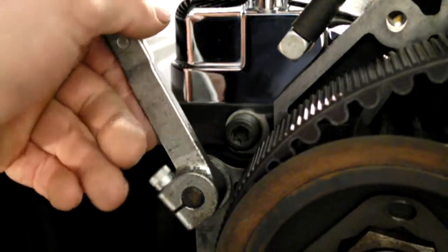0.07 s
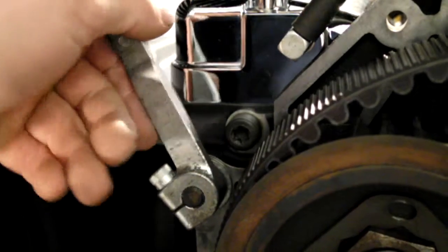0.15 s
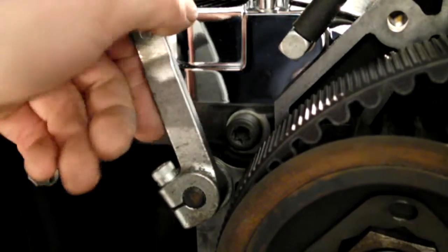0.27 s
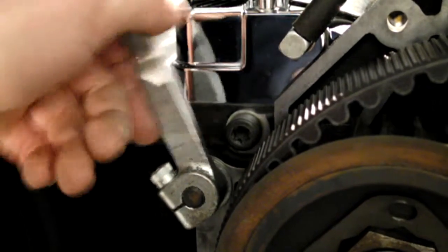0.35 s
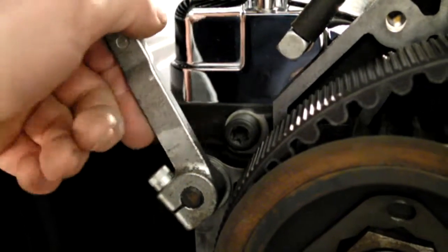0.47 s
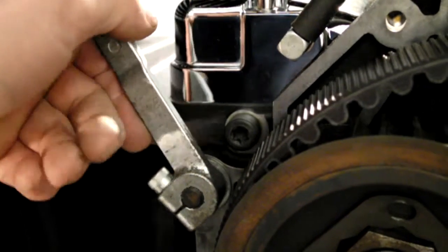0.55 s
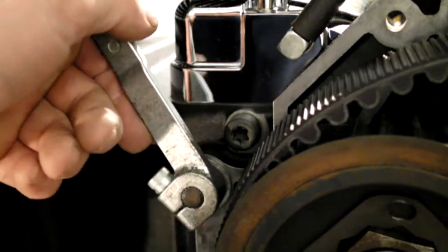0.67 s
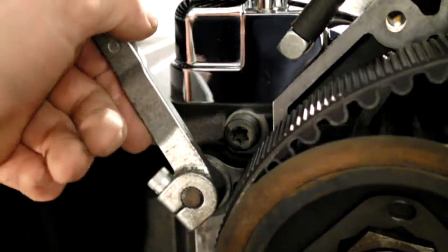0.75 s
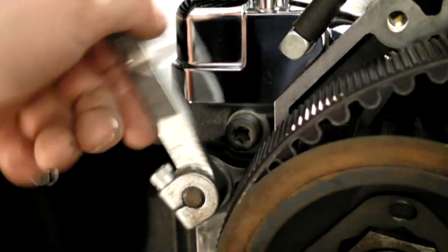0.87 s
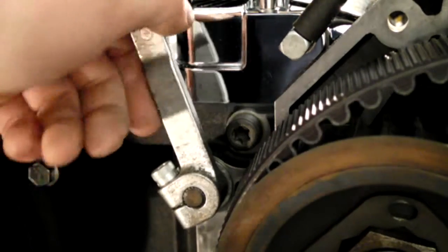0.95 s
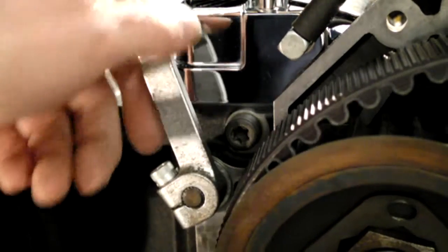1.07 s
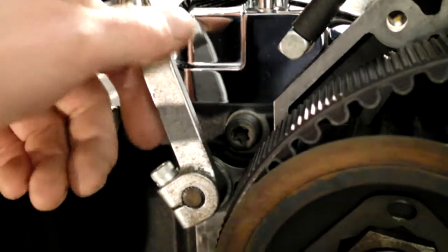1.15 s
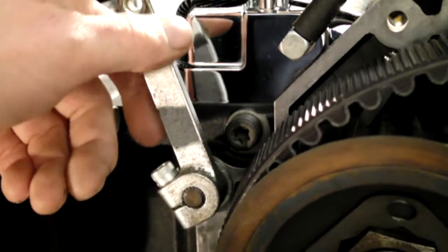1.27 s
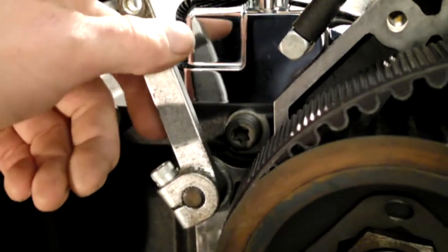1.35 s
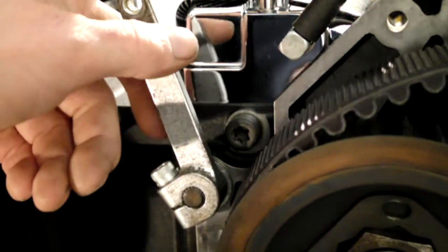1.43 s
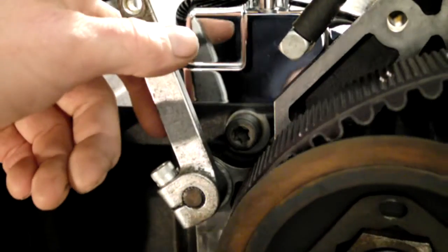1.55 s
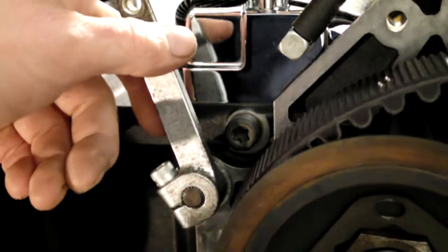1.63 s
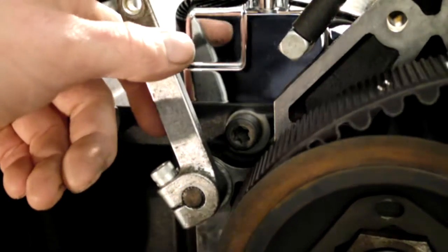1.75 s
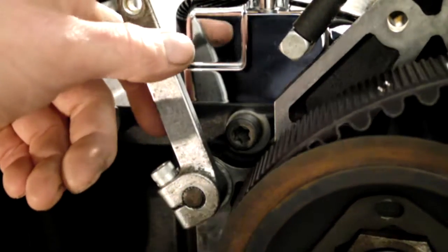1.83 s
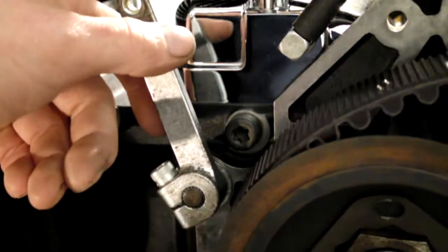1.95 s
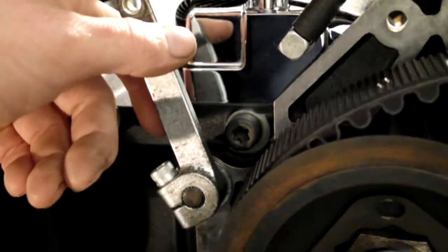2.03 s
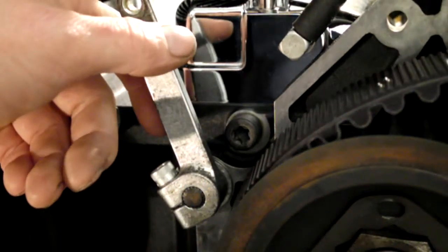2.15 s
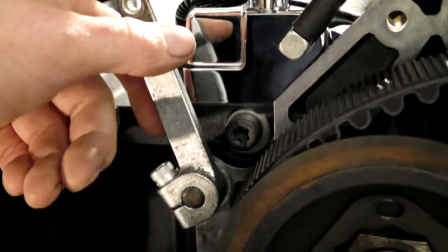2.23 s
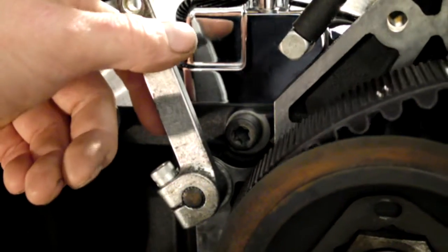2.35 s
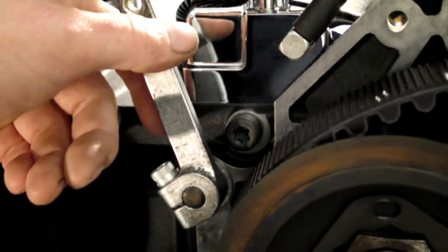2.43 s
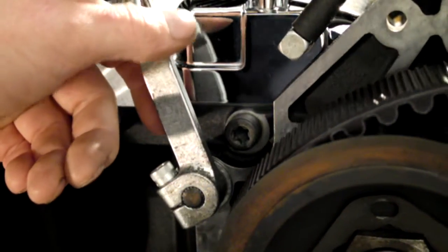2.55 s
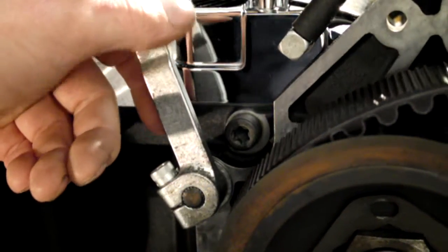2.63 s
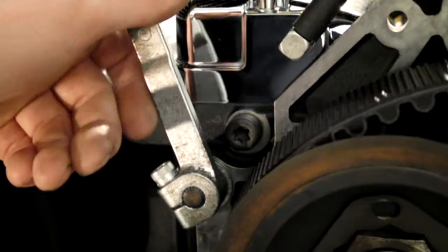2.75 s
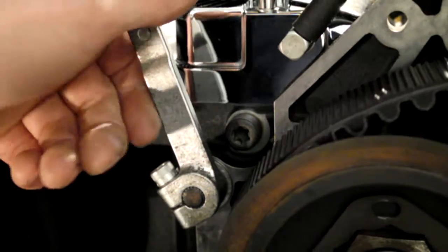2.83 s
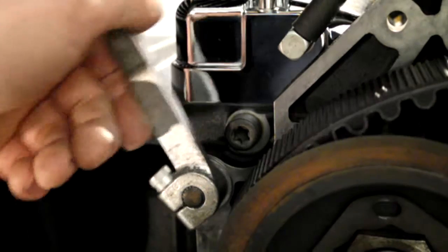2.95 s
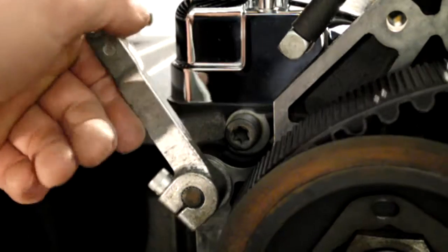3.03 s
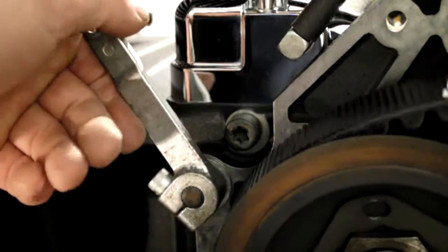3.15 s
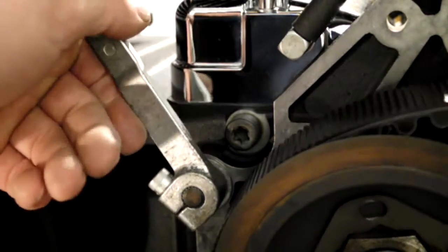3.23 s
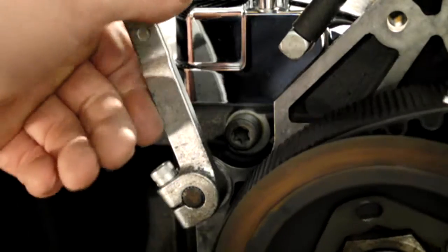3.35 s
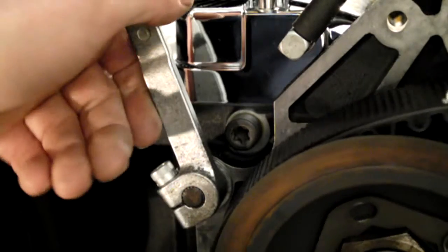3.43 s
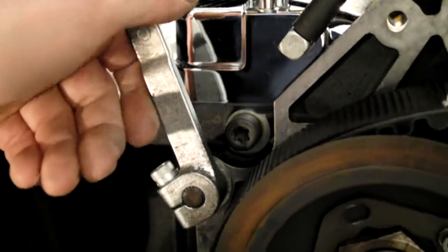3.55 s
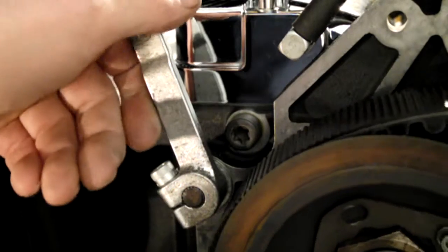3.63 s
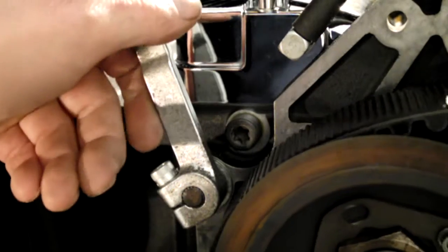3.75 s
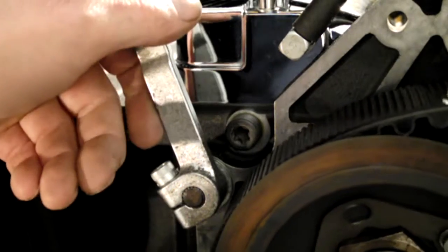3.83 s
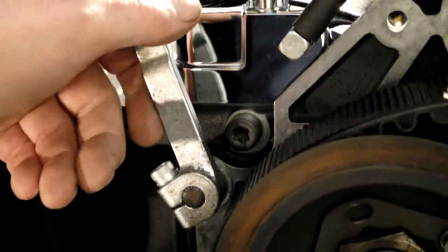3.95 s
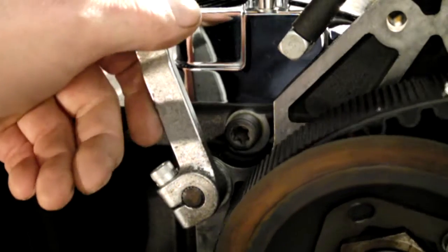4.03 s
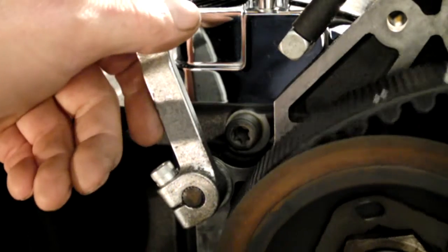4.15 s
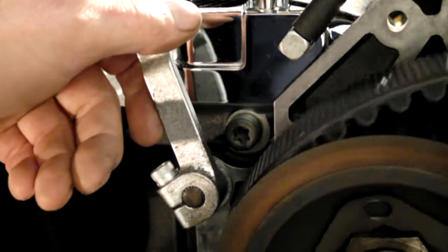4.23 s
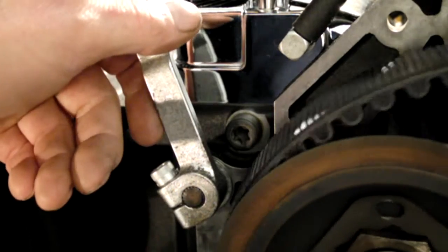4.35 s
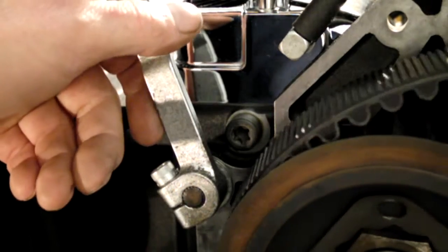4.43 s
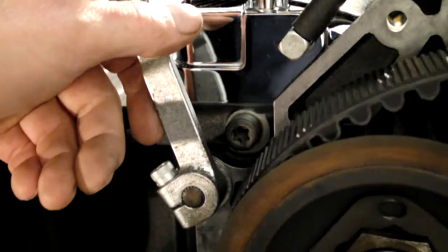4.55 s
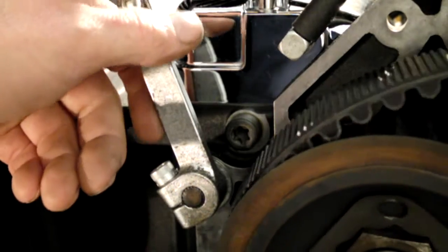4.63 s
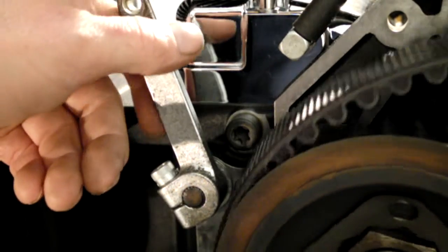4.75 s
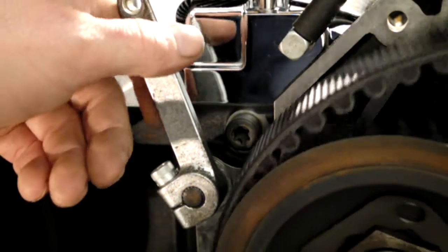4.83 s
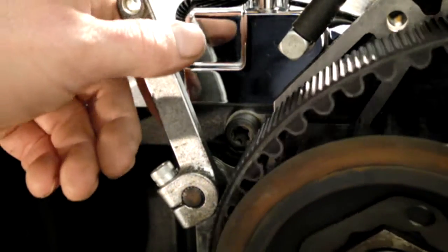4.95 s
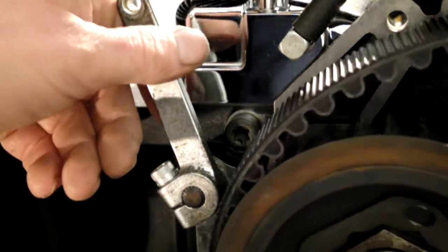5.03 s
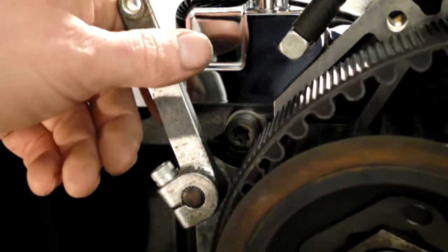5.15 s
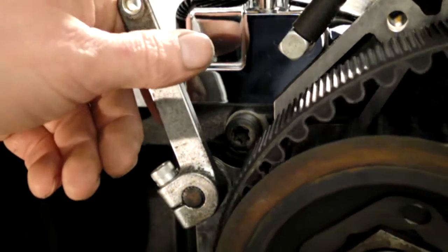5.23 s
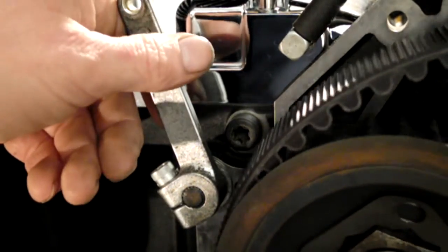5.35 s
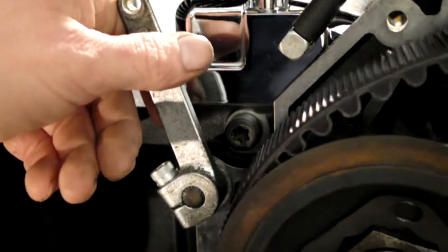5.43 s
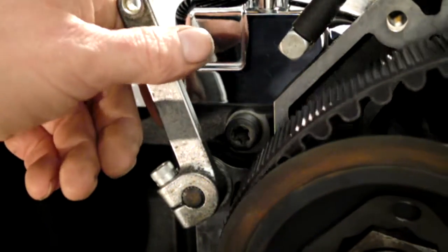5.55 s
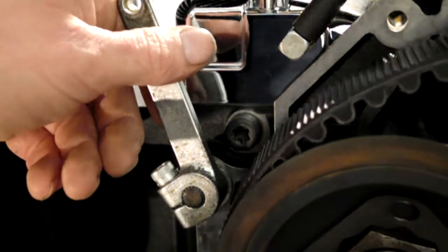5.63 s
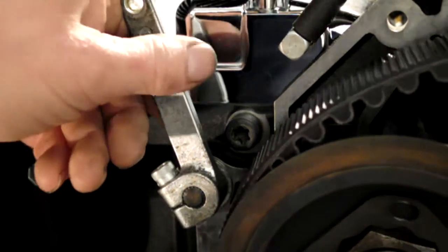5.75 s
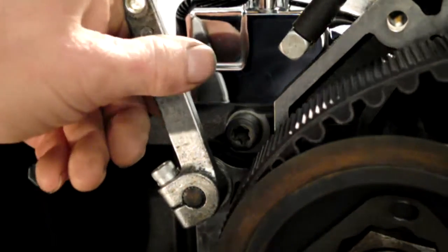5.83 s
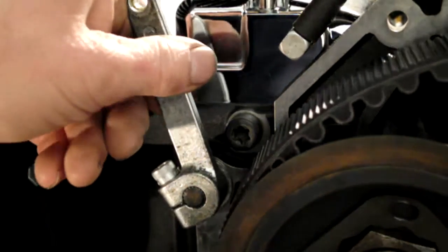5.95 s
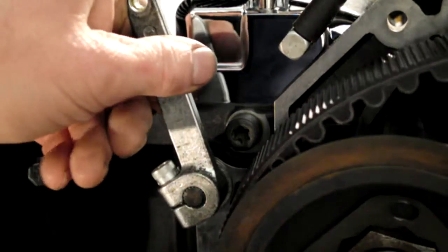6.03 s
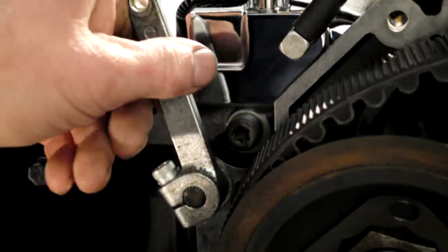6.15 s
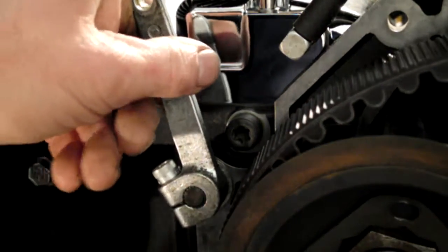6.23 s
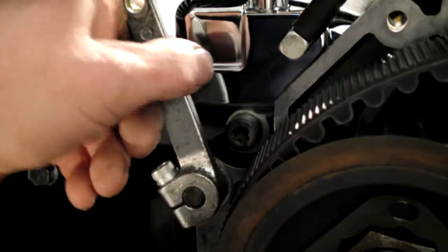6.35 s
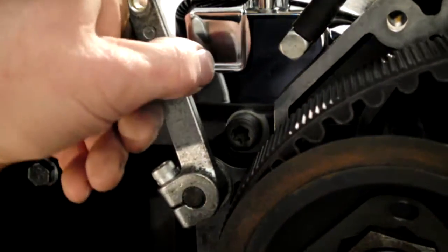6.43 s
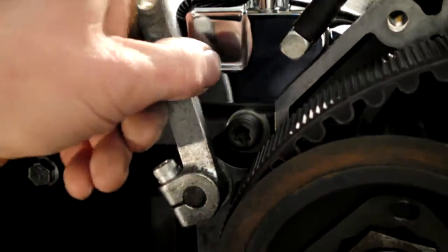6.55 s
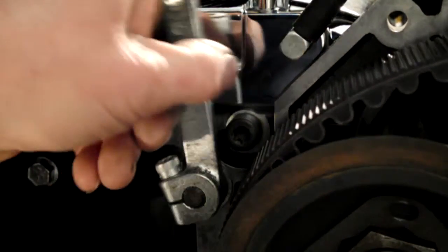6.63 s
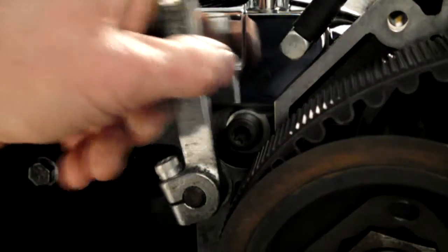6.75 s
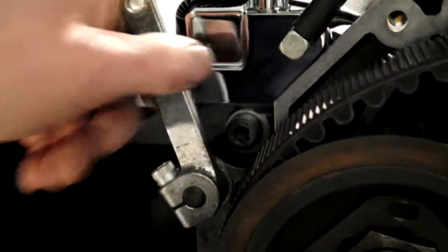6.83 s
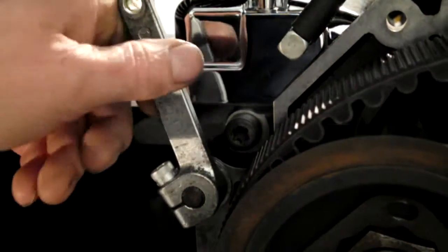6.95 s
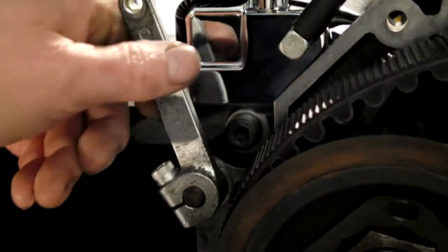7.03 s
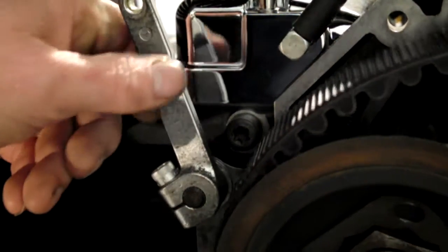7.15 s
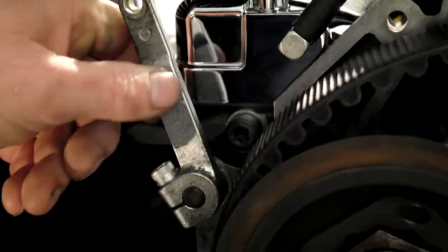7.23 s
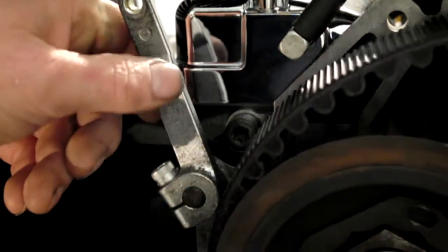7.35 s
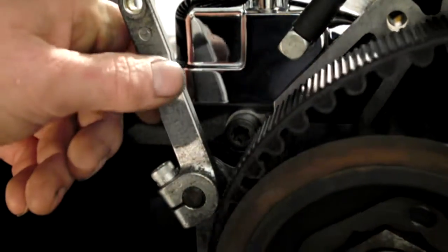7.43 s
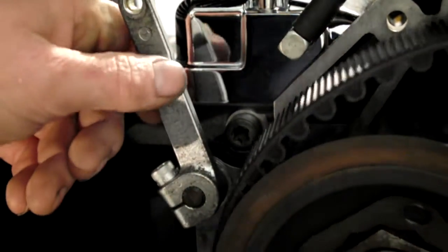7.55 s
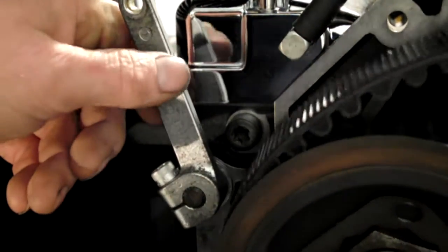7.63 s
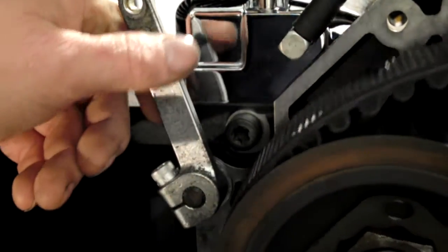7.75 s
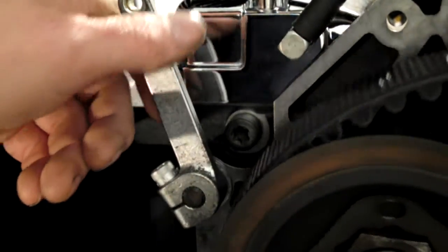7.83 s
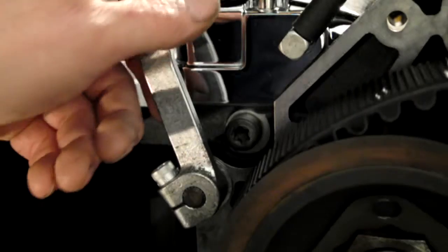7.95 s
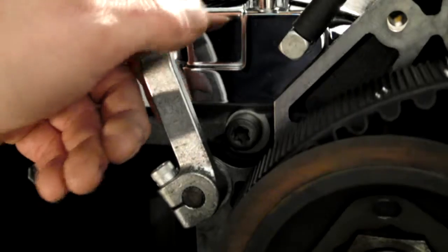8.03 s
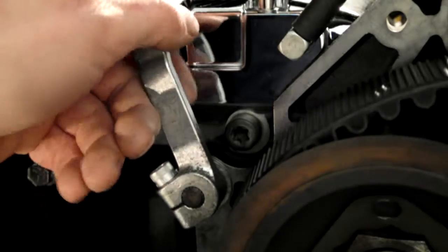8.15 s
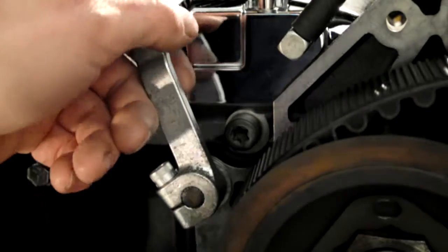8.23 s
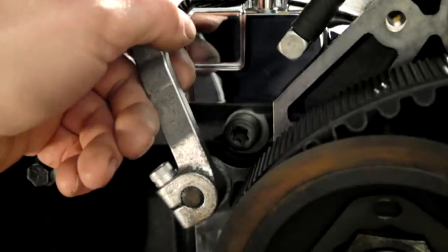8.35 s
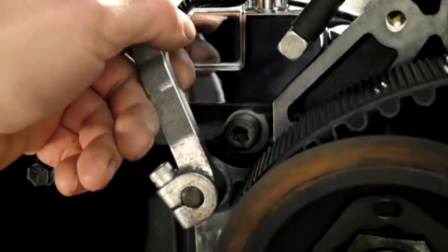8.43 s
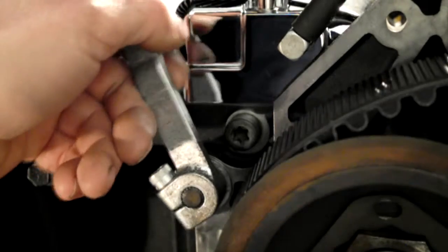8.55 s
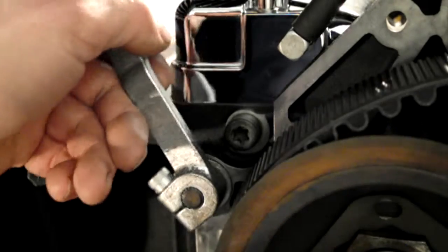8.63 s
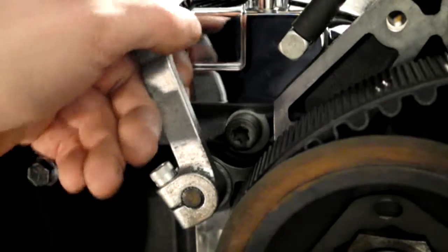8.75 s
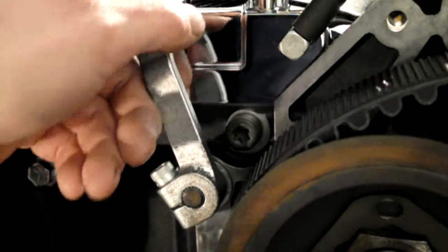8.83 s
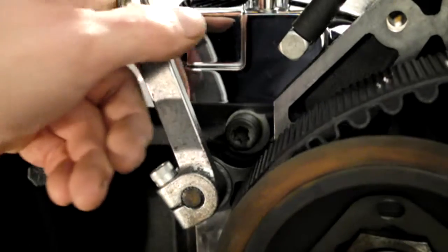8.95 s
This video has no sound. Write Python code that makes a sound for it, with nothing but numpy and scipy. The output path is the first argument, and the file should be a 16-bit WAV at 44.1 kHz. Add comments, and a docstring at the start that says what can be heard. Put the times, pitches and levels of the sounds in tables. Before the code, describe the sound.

Steel ratchet parts click and clack inside a gearbox, very near, in stereo, with a short indoor reverberation. Light clunks open, a quiet gap follows, then a crisp double snap, several hollow knocks, and the loudest group of sharp clacks. More dull knocks with faint rubbing follow, then a bright crack and small clicks. Soft low humming and airy hiss rise and sink throughout.

```python
"""In a workshop, close to the microphone, a hand works the gear lever of a motorcycle whose engine is off.
Ratchet and shift drum click and clack: shaped noise cracks, modes of the steel and reflections.
As the belt pulley is rocked, gear dogs knock dully (decaying modes) and belt and shaft rub (band noise).
Below lie a low hum of wavering sines and a thin hiss of shaped noise, which swell and fade."""
import sys
import numpy as np
from scipy import signal
from scipy.fft import rfft, irfft
from scipy.io import wavfile
from scipy.ndimage import uniform_filter1d

SR = 44100
rng = np.random.default_rng(int(sys.argv[2]) if len(sys.argv) > 2 else 0)


def unload_wav(signal):
    """Save mono or channel-first audio to the path in sys.argv[1] as 16-bit WAV at rate SR, clipped to [-1, 1]."""
    wavfile.write(
        sys.argv[1],
        SR,
        np.round(np.clip(np.atleast_2d(signal).T, -1, 1) * 32767).astype(np.int16),
    )


N = 396018  # samples

# All table levels are relative; gains follow where the sources are built.
# Spectrum of the background rumble and hiss: (frequency [Hz], density [dB per Hz])
AIR_SPECTRUM = [(15, -19), (24, -13), (31, -15), (41, -2), (54, -10.5), (72, -6), (90, -15), (135, -23),
                (330, -26), (700, -33), (1260, -36), (1560, -44), (2650, -37), (3300, -40), (15000, -44)]
# Crests of the swelling hiss and hum: (time [s], hiss level [dB], hum level [dB])
SWELLS = [(0, 1.5, -51.5), (.8, 5.5, -42), (3.5, 6, -42.5), (7.001, 5.5, -54.5), (7.75, 3, -49),
          (8.98, 8, -59)]
# Spectral lines of the hum: (frequency [Hz], level [dB], nominal line width [Hz])
HUM_LINES = [(69.2, -3, 1.57), (102.6, -14, 1.7), (108.3, -18.5, 1.2), (164, -23.5, 0.87),
             (200, -22.5, 1.4), (400, -22.5, 2)]
# Likeness of the two channels: (frequency [Hz], shared share of amplitude [0-1])
CHANNEL_LIKENESS = [(60, .95), (130, .86), (290, .85), (640, .78), (1400, .56), (3100, .25), (7000, .1)]
# Left channel over right: (frequency [Hz], level difference [dB])
LEFT_OVER_RIGHT = [(60, 4.5), (1200, 4), (2400, 2.5), (4400, 1), (8000, 2), (15000, -0.5)]
# Reverberation of the workshop: (frequency [Hz], t60 [s])
ROOM_DECAY = [(250, 0.91), (800, 0.5), (2200, 0.41), (3800, 0.4), (6000, 0.39), (9500, 0.34), (14000, 0.23)]
# Colour of its reflections: (frequency [Hz], level [dB])
WALL_COLOUR = [(300, 3), (800, -0.5), (1300, 0.5), (2400, 1), (3750, -4), (5000, 0.5), (6300, -2.5),
               (8000, -1.5), (14000, -2)]
# Belt and shaft rubbing as the pulley turns:
# (time [s], length [s], level [dB], centre [Hz], full width at half amplitude [Hz])
RUBS = [(0.599, 0.61, -59, 786, 1700), (4.08, 0.11, -63.5, 3720, 400), (4.759, 0.25, -64.5, 4550, 6900),
        (5.242, 0.14, -68.5, 5460, 5900), (7.2, .52, -60, 436, 14), (7.443, 0.25, -62.5, 5100, 5600),
        (8.861, 0.15, -49.5, 385, 490)]
# The frame booming under some of the blows: (time [s], level [dB], pitch [Hz])
FRAME_BOOMS = [(.555, -35.5, 213), (.557, -39.5, 880), (6.594, -38.5, 62), (6.657, -38, 390),
               (7.083, -46, 845), (7.209, -51, 468), (7.707, -44, 330), (7.708, -48.5, 690)]
# Gear dogs taking up their slack: (time [s], level [dB], brightness [dB per octave])
DOGS = [(4.1225, -40.5, -0.5), (4.3709, -38.5, 0.5), (4.8803, -43, -1), (5.5868, -63, 10.5),
        (7.0822, -38.5, 9.5), (7.2078, -39.5, 3.5)]
# Modes of the gear train: (frequency [Hz], level [dB], t60 [s])
GEAR_MODES = [(302, -10.5, 0.19), (418, -1.5, 0.062), (510, -6, 0.1), (612, -5.5, 0.052), (708, 2, 0.027),
              (910, 6, 0.058), (917, -1.5, 0.086), (1787, -9.5, 0.061), (1877, -8.5, 0.069)]
# Centres of the bands in which a blow is built: [Hz]
BANDS_HZ = [450, 1100, 2300, 4000, 7500, 13000]
# Broad response of the gearbox case: (frequency [Hz], level [dB])
CASE_RESPONSE = [(90, -17), (230, -2), (650, -5), (1130, 3.5), (1570, -13.5), (1880, -3), (2400, -1),
                 (3050, -4), (3750, 7), (4750, -1), (6100, 5.5), (8200, 0.5), (9300, -1), (15000, -13.5)]
# Modes of lever, shaft and drum, detuned slightly at each blow: (frequency [Hz], level [dB], t60 [s])
STEEL_MODES = [(235, -5, .15), (305, -5, .15), (350, -6, .12), (445, -4, .1), (560, -6, .08),
               (790, -4, .05), (960, -4, .06), (1090, -4, .05), (1210, -5, .05), (1794, -5, .1),
               (1890, -4, .08), (1972, -5, .1), (2198, -8, .11), (2250, -8, .11), (2460, -7, .08),
               (2960, -5, .1), (3423, -2, .08), (3732, -2, .06), (3968, -2, .06), (4236, -6, .07),
               (5701, -6, .12), (5897, -6, .1), (6115, -5, .1), (6332, -4, .11), (7430, -7, .07),
               (7735, -8, .08), (8565, -7, .09), (9240, -3, .06), (9450, -7, .07), (11400, -9, .06)]
# Dull knocks of the case as the gears engage; a softer contact has a lower cut-off:
# (time [s], level [dB], cut-off [Hz])
KNOCKS = [(0.5544, -37.5, 2600), (.607, -45.5, 1700), (.753, -54.5, 6500), (1.565, -51.5, 2700),
          (2.362, -54.5, 2600), (3.2748, -52.5, 7000), (4.272, -52, 1200), (4.445, -56, 3900),
          (6.5447, -54, 1200), (7.082, -42.5, 2100), (7.7065, -41, 4200), (8.922, -56, 4000)]
# Colour of a knock: (frequency [Hz], level [dB])
KNOCK_COLOUR = [(450, -1), (1100, 0), (2300, -1), (4000, -3.5), (7500, -3.5), (13000, -8)]
# Sharp clicks of ratchet, pawl and shift drum: (time [s], level [dB], brightness [dB per octave],
# thud [dB], pitch of the struck part [Hz], reflections [dB])
CLICKS = [ (.208, -56.5, 7, 11.5, 3960, -7.5), (0.3861, -38, -2.5, 3, 4050, -3),
          (.537, -45.5, 4, 9, 3650, -8), (0.54, -41, 2.6, 2, 3700, -4.5), (0.9056, -49, 6, 9.5, 3900, -3.5),
          (2.982, -46, -4.5, -3, 3830, -6), (3.0241, -43.5, -11, 5, 2410, 0.5),
          (3.0373, -32.5, 1, -3.5, 6400, -0.5), (3.346, -24.5, 3, -1.5, 6060, -6),
          (3.35, -30.5, 4.5, -1, 9200, -7.5), (6.308, -42, 1, -4, 6100, -1), (6.377, -44, -3, -1, 2200, -1),
          (6.585, -33, .9, 2, 6110, -3.5), (6.594, -25.4, 1.3, -2.5, 3780, -4.5),
          (6.6563, -19.5, -1, -3, 3670, -5), (6.7711, -36.5, -.5, -1, 3840, -10.5),
          (6.834, -22.5, 3.5, -4, 9230, -7), (8.6116, -42, 4.5, 0.8, 2400, 3.5),
          (8.62, -24.5, -0.65, -12, 3570, -7), (8.721, -46.5, 0.5, 5.5, 3750, 3.5),
          (8.747, -32.5, -4, -3, 2420, -2.5), (8.7533, -30.5, -7, -10, 3840, -9),
          (8.79, -52, 5, 10, 3750, -9)]
# Colour of a click: (frequency [Hz], level [dB])
CLICK_COLOUR = [(450, -16), (1100, -8), (2300, -1.06), (4000, -0.54), (7500, -2.5), (13000, -9)]

SWELL_DB_PER_S, HISS_SINK_DB_PER_S, HUM_SINK_DB_PER_S = 18.5, 6.5, 7
BOOM_T60_S, BOOM_WIDTH = .33, .45  # width as a share of the pitch
CLICK_T60_S, KNOCK_T60_S = 0.067, .05  # at 4000 Hz
KNOCK_ROOM_DB = -6.5
THUD_HZ, BRIGHT_HZ = 990, 2420  # thud is full below the first, gone at the second, where brightness begins
PING_DB, PING_WIDTH_HZ, PING_T60_S = -5.5, 450, 0.052  # ring round the pitch of the struck part
CHATTER_DB, CHATTER_DB_PER_S, CHATTER_FROM_S, CHATTER_TO_S = -18, 128.5, .012, .11
EDGE_HZ = 15250  # upper band limit


def amp(db):
    """Level and amplitude: 20 dB are a factor of ten."""
    return 10 ** (np.asarray(db) / 20)


def evened(x):
    """Normalization: scales a signal to rms 1."""
    return x / np.sqrt(np.mean(x ** 2) + 1e-20)


def read(points, hz):
    """Interpolation of a table along a logarithmic frequency axis."""
    f, value = np.transpose(points)
    return np.interp(np.log(hz + 1), np.log(f + 1), value)


def add(mix, s, sound):
    """Superposition: a stereo sound is summed in at time s, in place."""
    part = mix[:, round(s * SR):][:, :sound.shape[1]]
    part += sound[:, :part.shape[1]]


def noise(colour, size):
    """Partial coherence: stereo noise of gain colour(Hz), alike in the bass, nearly unrelated in the treble."""
    hz = np.fft.rfftfreq(size, 1 / SR)
    a, b, c, d = rng.standard_normal((4, len(hz)))
    alike = np.clip(read(CHANNEL_LIKENESS, hz), 0, 1)
    left = a + 1j * b
    right = alike * left + np.sqrt(1 - alike ** 2) * (c + 1j * d)
    return evened(irfft(np.array([left, right]) * colour(hz), size))


def resonance(centre_hz, width_hz):
    """Resonance curve: gain falls to half at half the width from the centre."""
    return lambda f: 1 / (1 + (2 * (f - centre_hz) / width_hz) ** 2)


def swell(crests_db, sink_db_per_s):
    """Exponential growth and decay: gain climbs quickly to each crest and sinks more slowly after it."""
    since = np.arange(N) / SR - np.array(SWELLS)[:, :1]
    slopes_db = np.minimum(SWELL_DB_PER_S * since, -sink_db_per_s * since)
    return amp((crests_db[:, None] + slopes_db).max(0))


def air(level_db=-52):
    """Broadband noise: the rumble and hiss of the workshop have a continuous spectrum."""
    hiss = noise(lambda f: amp(read(AIR_SPECTRUM, f)) * (f > 8), N)
    return amp(level_db) * swell(np.array(SWELLS)[:, 1], HISS_SINK_DB_PER_S) * hiss


def hum(level_db=0, waver=0.13):
    """Line broadening: a random walk of phase widens each low line, whose strength also wavers."""
    t, out = np.arange(N) / SR, np.zeros(N)
    for hz, db, width in HUM_LINES:
        drift = np.cumsum(rng.standard_normal(N)) * np.sqrt(2 * np.pi * width / SR)
        smooth = uniform_filter1d(rng.standard_normal(N), size=6000)
        flutter = evened(uniform_filter1d(smooth, size=3000))
        phase = 2 * np.pi * hz * t + uniform_filter1d(drift, size=2000)
        out += np.sqrt(2) * amp(db) * (1 + waver * flutter) * np.sin(phase)
    return amp(level_db) * swell(np.array(SWELLS)[:, 2], HUM_SINK_DB_PER_S) * out


def workshop(x, wet_db=-2, build_s=0.0077):
    """Reverberation: dense reflections from machine and walls, each band dying at its own rate."""
    taps = noise(np.ones_like, size=20480)
    hz, t, z = signal.stft(taps, SR, nperseg=256)
    fade = amp(read(WALL_COLOUR, hz)[:, None] - 60 * t / read(ROOM_DECAY, hz)[:, None])
    tail = signal.istft(z * fade, SR, nperseg=256)[1]
    seconds = np.arange(tail.shape[1]) / SR
    tail = tail * (1 - np.exp(-(seconds / build_s) ** 2))
    wet = signal.fftconvolve(x, tail / np.linalg.norm(tail[0]), axes=1)
    return amp(wet_db) * wet[:, :x.shape[1]]


def in_room(sound, room_db):
    """Direct and reflected sound: one blow with its own reflections."""
    sound = np.pad(sound, ((0, 0), (0, SR // 3)))
    return sound + amp(room_db) * workshop(sound)


def rubs():
    """Friction noise: rubbing surfaces excite one resonance, in a soft swell."""
    out = np.zeros((2, N))
    for s, length, db, hz, width in RUBS:
        size = int(length * SR)
        rub = noise(resonance(hz, width), size)
        add(out, s, amp(db) * rub * signal.windows.tukey(size, .6))
    return out


def burst(hz, width, t60):
    """Bandwidth and build-up: crowded resonances round one pitch, slower to build when narrow."""
    t = np.arange(SR // 2) / SR
    body = noise(resonance(hz, width), len(t)) * amp(-60 * t / t60)
    early = body[:, :SR // 30]
    return (1 - np.exp(-np.pi * width * t)) * body / early.std()


def frame():
    """Structural resonance: the frame booms under some of the blows."""
    out = np.zeros((2, N))
    for s, db, hz in FRAME_BOOMS:
        add(out, s, amp(db) * burst(hz, BOOM_WIDTH * hz, BOOM_T60_S))
    return out


def ring(modes, t, scatter_db):
    """Modal decay: each blow excites the modes differently; high ones reach the channels out of step."""
    hz, db, t60 = np.transpose(modes)[:, :, None]
    size, phase, skew = rng.standard_normal((3, len(modes), 1))
    apart = skew * np.minimum(hz / 3000, 2)
    fade = amp(db + scatter_db * size - 60 * t / t60)
    angle = 2 * np.pi * (hz * t + phase)
    return np.array([(fade * np.sin(angle + side * apart)).sum(0) for side in (-.5, .5)])


def dogs(tick_db=-5, tick_t60=0.023):
    """Damped modes: gear dogs knock dully in the oily gear train, with a short tick of contact noise."""
    out, t = np.zeros((2, N)), np.arange(SR // 2) / SR
    onset = 1 - np.exp(-t / 0.0017)
    for s, db, bright_db in DOGS:
        modes = [(hz, level + bright_db * np.log2(hz / 926), t60) for hz, level, t60 in GEAR_MODES]
        contact = noise(lambda f: f / (f + 200) / (1 + (f / 1100) ** 2), len(t))
        tick = contact * amp(tick_db - 60 * t / tick_t60)
        teeth = ring(modes, t, scatter_db=1)
        add(out, s, amp(db) * (teeth + tick) * onset)
    return out


def blow(levels_db, t60, bass_hold=0.094, direct_s=0.00034):
    """Impact excitation: a crack of dense, quickly dying case resonances and a faint ring of the steel."""
    size, attack = 12288, 617  # samples
    steel_db, detune, rise_s = -10, .004, .0006
    t, hz = np.arange(size) / SR, np.fft.rfftfreq(size, 1 / SR)
    crack = noise(lambda f: amp(read(CASE_RESPONSE, f)) * f ** 2 / (f ** 2 + 110 ** 2), size)
    # the first instant reaches both channels alike, before the machine's surfaces scatter it
    direct = np.exp(-t / direct_s)
    right = direct * crack[0] + np.sqrt(1 - direct ** 2) * crack[1]
    crack = rfft([crack[0], right])
    # the parts bear on each other differently at every blow, which shifts their modes
    shift = np.outer(rng.standard_normal(len(STEEL_MODES)), [detune, 0, 0])
    steel = rfft(ring(np.array(STEEL_MODES) * (1 + shift), t, scatter_db=2.5), 2 * size)
    steel_hz = np.fft.rfftfreq(2 * size, 1 / SR)
    onset = 1 - np.exp(-t / rise_s)
    out = np.zeros((2, size))
    for centre, db, share in zip(BANDS_HZ, levels_db, np.eye(len(BANDS_HZ))):
        band = list(zip(BANDS_HZ, share))  # full at its own centre, nothing at the neighbours'
        band_t60 = t60 * (4000 / centre) ** bass_hold
        dense = irfft(crack * read(band, hz), size) * amp(-60 * t / band_t60)
        lines = irfft(steel * read(band, steel_hz))[:, :size]
        dense = dense / dense[:, :attack].std()
        lines = lines / lines[:, :attack].std()
        part = onset * (dense + amp(steel_db) * lines)
        out += amp(db) * part / part[:, :attack].std()
    return out


def chatter(sound):
    """Repeated impact: loose parts rebound weakly six times, at uneven moments, after a blow."""
    out = np.pad(sound, ((0, 0), (0, SR // 4)))
    for when, strength in rng.random((6, 2)):
        s = CHATTER_FROM_S + when * (CHATTER_TO_S - CHATTER_FROM_S)
        add(out, s, strength * amp(CHATTER_DB - CHATTER_DB_PER_S * s) * sound)
    return out


def knocks(level_db=-1):
    """Contact time: softer blows inside the case last longer, which cuts their treble off steeply."""
    out, bands = np.zeros((2, N)), np.array(BANDS_HZ)
    for s, db, cut_hz in KNOCKS:
        softness_db = -10 * np.log10(1 + (bands / cut_hz) ** 10)
        knock = chatter(blow(db + read(KNOCK_COLOUR, bands) + softness_db, KNOCK_T60_S))
        add(out, s, in_room(knock, KNOCK_ROOM_DB))
    return amp(level_db) * out


def octaves_bright(hz):
    """Spectral tilt: octaves above the pitch where brightness begins."""
    return np.maximum(np.log2(hz / BRIGHT_HZ), 0)


def clicks(level_db=-1):
    """Hard impact: steel snaps on steel with a bright crack, a thud in the case and a ping of the struck part."""
    out, bands = np.zeros((2, N)), np.array(BANDS_HZ)
    bass = read([(THUD_HZ, 1), (BRIGHT_HZ, 0)], bands)
    for s, db, bright_db, thud_db, hz, room_db in CLICKS:
        colour_db = read(CLICK_COLOUR, bands) + bright_db * octaves_bright(bands) + thud_db * bass
        click = chatter(blow(db + colour_db, CLICK_T60_S))
        ping_db = db + PING_DB + bright_db * octaves_bright(hz)
        add(click, 0, amp(ping_db) * burst(hz, PING_WIDTH_HZ, PING_T60_S))
        add(out, s, in_room(click, room_db))
    return amp(level_db) * out


def scene(dog_room_db=-10):
    """Superposition: the gearbox sounds, those of frame and belt, and the background add linearly."""
    teeth = dogs()
    gearbox = clicks() + knocks() + teeth + amp(dog_room_db) * workshop(teeth)
    return gearbox + frame() + rubs() + hum() + air()


def record(dry):
    """Saturation and band limit: the channels are tilted apart, hard peaks rounded, the top cut off."""
    ceiling = .8
    lean_db = read(LEFT_OVER_RIGHT, np.fft.rfftfreq(N, 1 / SR)) * np.array([[.5], [-.5]])
    leaning = irfft(rfft(dry) * amp(lean_db), N)
    rounded = leaning / (1 + (leaning / ceiling) ** 4) ** .25
    lowpass = signal.firwin(511, EDGE_HZ, window=("kaiser", 9), fs=SR)
    return signal.oaconvolve(rounded, lowpass[None], "same")


dry = scene()
out = record(dry)
unload_wav(out)
```